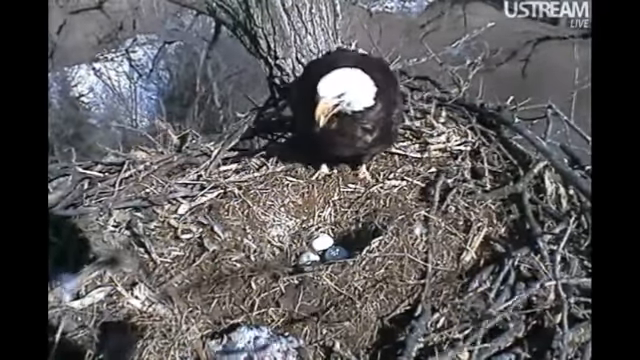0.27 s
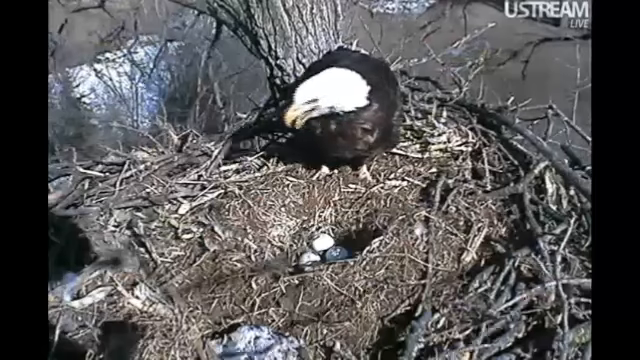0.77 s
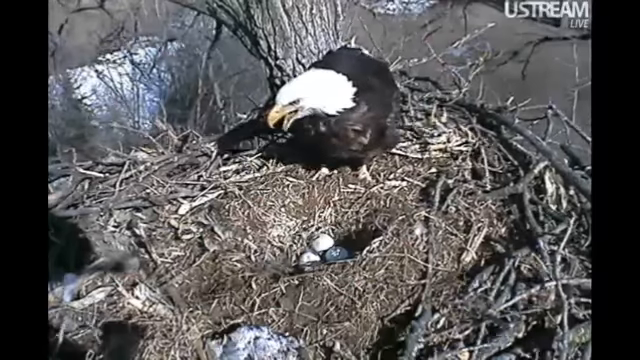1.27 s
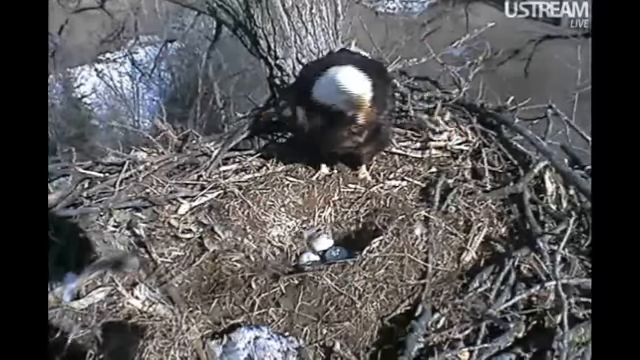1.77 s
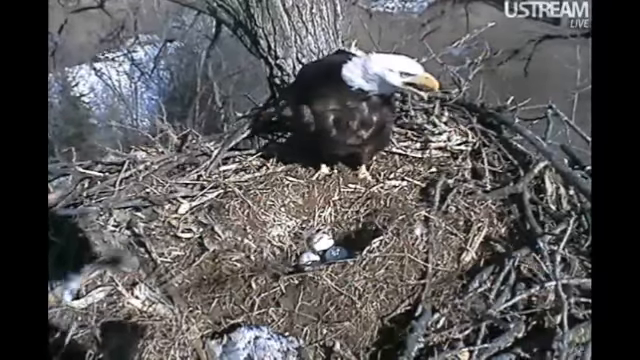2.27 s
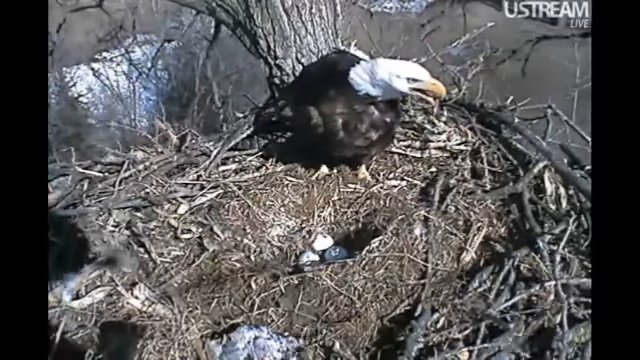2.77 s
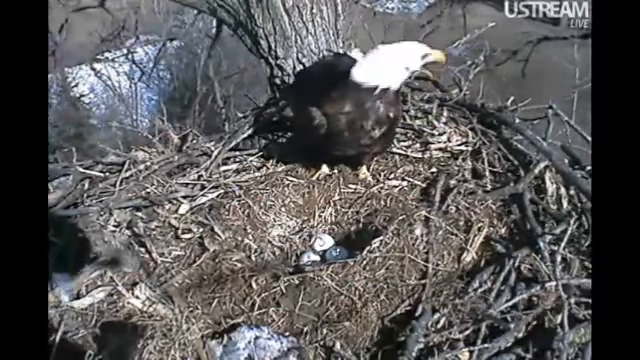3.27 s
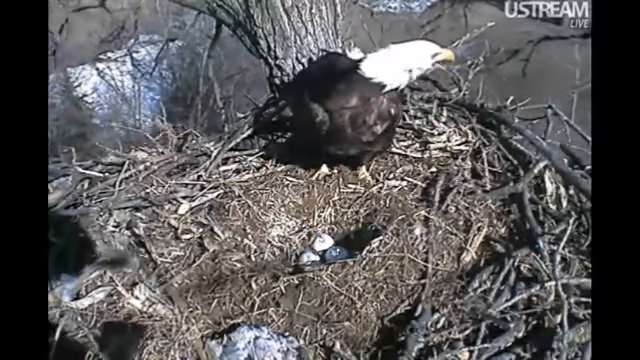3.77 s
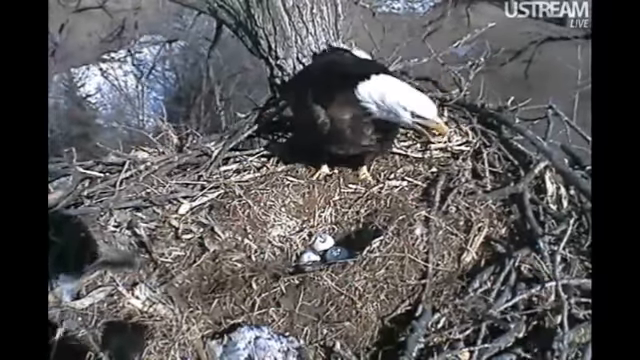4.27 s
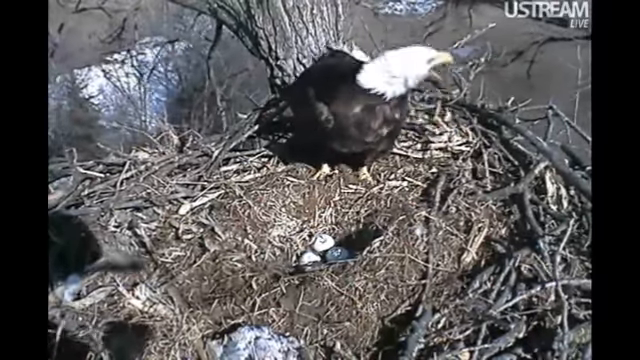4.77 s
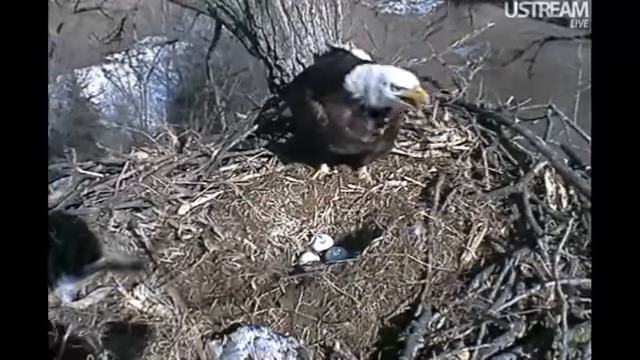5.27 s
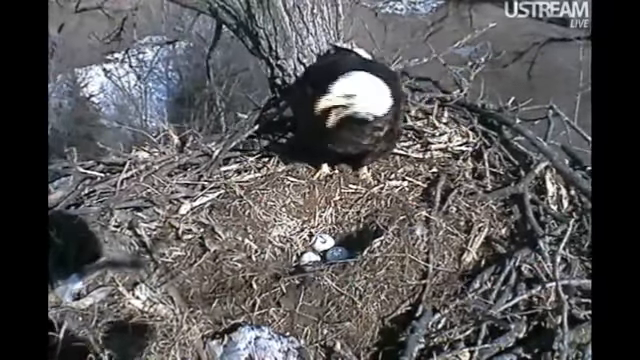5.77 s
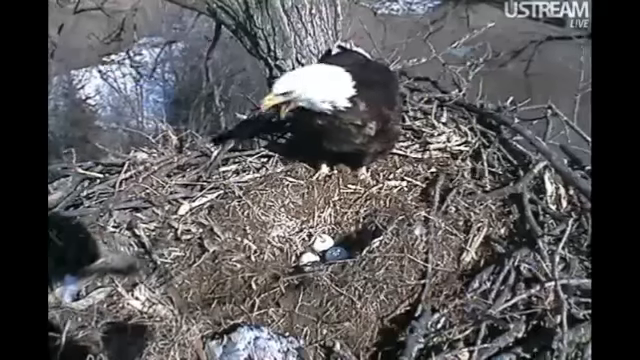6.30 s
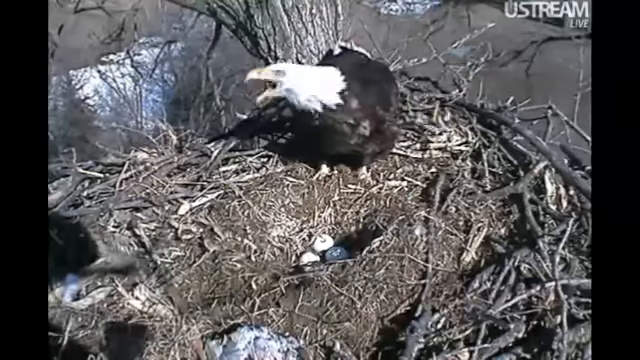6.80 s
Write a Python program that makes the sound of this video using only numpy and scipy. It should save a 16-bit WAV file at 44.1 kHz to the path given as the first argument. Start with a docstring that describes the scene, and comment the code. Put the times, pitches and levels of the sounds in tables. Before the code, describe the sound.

From the start, heavy wind roars low in the branches and buffets a small outdoor microphone, its gusts clipping into a gritty rasp. A bald eagle at its nest immediately gives three sharp, high whistled chirps within 0.3 seconds, ending in a soft chip. Wind alone fills the gap until 1.5, when four more chirps leap and drop in pitch, fading into lower chips by 2.0. Gusts swell around 2.5 to 2.9. Another four-chirp volley comes at 3.1 to 3.6, then a weaker, rougher, more reverberant one at 4.5 to 5.1. The wind eases from about 4.4, with small thuds of air near 4.8 to 5.5 and 6.1. The clearest, loudest volley, six chirps, runs 5.75 to 6.4, trailing into chips. Wind builds again, and at 6.9 a rough trilled squeal flips upward and sinks at the abrupt end.

```python
"""An eagle on its treetop nest chitters in alarm in strong wind, about 7 s.
From the start, wind roars in the trees and buffets a small microphone: two sums of third-octave noise bands.
Five bursts of chirps and soft chips follow, each chirp a whistle leaping through short pitch arches.
The wind eases in the fifth second and returns at the end, under a sixth call: one long trilled squeal.
Throughout, an overloaded amplifier turns gusts to a rasp and lets loud chirps push the wind aside."""
import sys
import numpy as np
from scipy import signal
from scipy.io import wavfile
from scipy.ndimage import uniform_filter1d

SR = 44100
rng = np.random.default_rng(int(sys.argv[2]) if len(sys.argv) > 2 else 0)


def transcribe(u):
    """Save the signal u as a 16-bit wav file named by the first command-line argument.

    u: samples, shape (n,) or (channels, n), limited to [-1, 1]; the rate is SR.
    q: integer samples, one column per channel.
    """
    v = np.clip(np.atleast_2d(u).T, -1, 1)
    q = np.round(v * 32767).astype(np.int16)
    wavfile.write(sys.argv[1], SR, q)


N = 310464

BUZZ_HZ = 700   # bandwidth of the irregular vibration
EDGE_S, RELEASE_S = 0.0018, 0.0016


def eagle(voice_db=0.5, jitter=0.00501, shimmer_db=3.5, octave_db=-13, rasp_db=-22,
          top_register_hz=6500, second_db=-16, scrape_db=-46, broadband_db=-19, loud_db=-27):
    """Syrinx whistle whose pitch bends and jumps; rough arches flutter and break up into a buzz."""
    hz, level, rough, opening = syrinx_controls()
    level = smooth(level, EDGE_S)
    # the membranes ring down
    ringing = butter(level, 1 / (2 * np.pi * RELEASE_S), "low", order=1)
    level = np.maximum(level, ringing)
    level = level * from_db(voice_db + shimmer_db * drift(254))

    flutter = 0.055 * rough * sine(520 * (1 + 0.25 * drift(60)))
    wobbly_hz = hz * (1 + flutter + jitter * drift(521))
    phase = 2 * np.pi * np.cumsum(wobbly_hz) / SR

    # louder calls gain a stronger octave and a broadband rasp, as from an overloaded converter
    loudness = np.minimum(level / from_db(loud_db), 1)
    noise = butter(rng.standard_normal(N), [2000, 12000], "band")
    broadband_rasp = from_db(broadband_db) * rms_one(noise)
    octave = from_db(octave_db) * np.cos(2 * phase)
    tone = np.sin(phase) + loudness * (octave + broadband_rasp)

    # irregular vibration spreads the tone into a noise band around its pitch
    swell, sway = rms_one(butter(rng.standard_normal((2, N)), BUZZ_HZ, "low", order=4))
    buzz = (swell * np.sin(phase) + sway * np.cos(phase)) / 2
    air = rms_one(butter(rng.standard_normal(N), [2600, 7500], "band", order=3))
    voice = np.sqrt(1 - rough ** 2 / 2) * tone + rough * (buzz + from_db(rasp_db) * air)

    # in the top register the other side of the syrinx adds a low second voice
    in_top = smooth(1.0 * (hz > top_register_hz), EDGE_S)
    second = from_db(second_db) * in_top * sine(2600 * (1 + 0.057 * drift(329.4)))
    scrape = from_db(scrape_db) * smooth(opening, 0.0037) * air
    return level * (voice + second) + scrape


# chirps: quick high warble arches, then a drop to a longer closing arch; levels before voice gain
# [t/s, length/s, warble arches, warble f/Hz, climb over warble/Hz, closing f/Hz,
#  warble level/dB, closing level/dB, roughness/0-1]
CHIRP_ROWS = [(0.063, 0.029, 1, 4665, 96, 4010, -22, -19.5, 0),
              (0.158, 0.031, 1, 4570, -700, 3920, -22, -22, 0.3),
              (0.255, 0.030, 1, 3870, -500, 3590, -22.5, -32.5, 0.3),
              (1.477, 0.048, 2, 3900, 0.5, 3790, -32, -31, 0.4),
              (1.588, 0.043, 2, 4890, 150, 4040, -26, -25, 0.2),
              (1.700, 0.030, 1, 5040, 300, 4186, -22.5, -20, 0.16),
              (1.812, 0.033, 1, 3940, -200, 3190, -20, -30.5, 0.12),
              (3.1, 0.043, 2, 4410, -0.5, 3870, -24.5, -25.5, 0.2),
              (3.209, 0.044, 2, 4740, 101, 4780, -39, -35, 0.67),
              (3.328, 0.04, 2, 4780, 299, 3910, -25.5, -28.5, .03),
              (3.442, 0.028, 1, 4435, 304, 3870, -33.5, -22, 0),
              (4.480, 0.037, 1, 3750, -200, 3640, -30.5, -36.5, 0.2),
              (4.573, 0.046, 2, 4660, 0, 3800, -33, -34, .3),
              (4.671, 0.041, 2, 5200, 0, 4720, -38, -32, 0.57),
              (4.77, 0.048, 2, 4250, -300, 3100, -31, -47, .7),
              (4.876, 0.042, 2, 3725, -200, 2960, -33.5, -47, .05),
              (5.752, 0.061, 1, 4390, 550, 3860, -25.5, -16, .16),
              (5.873, 0.045, 2, 5200, 1500, 4770, -28.5, -22.5, 0.31),
              (5.984, 0.044, 2, 4840, 50, 3900, -23, -25, .33),
              (6.094, 0.028, 1, 4700, 400.5, 3924, -26, -22, 0.65),
              (6.195, 0.044, 2, 3720, -100, 3140, -25.5, -42, 0.37),
              (6.304, 0.03, 1, 3905, -400, 3020, -31, -40, 0.33)]
# soft single chips; levels before voice gain
# [t/s, length/s, f/Hz, level/dB, roughness/0-1]
CHIP_ROWS = [(0, 0.011, 3900, -35.5, .15), (0.352, 0.009, 4047, -38.5, 0.7),
             (1.924, 0.012, 3090, -26.5, .45), (2.028, 0.01, 2850, -33, 0.15),
             (3.556, 0.018, 3616, -25.5, 0.29), (4.973, 0.019, 3530, -33.5, 0.16),
             (5.062, 0.028, 2880, -55, .2), (6.404, 0.015, 3103, -33.5, 0.77),
             (6.496, 0.017, 2834, -44.5, 0.36)]
DROOP_HZ_PER_S = 11000   # fall of closing arches and chips


def syrinx_controls(scrape_s=0.013, high_hz=4680):
    """Pitch, level, roughness and opening scrape, sample by sample."""
    t = np.arange(N) / SR
    hz, level, rough, opening = np.zeros((4, N))
    strokes = [stroke for row in CHIRP_ROWS for stroke in chirp(*row)]
    strokes += [arch(*row, -DROOP_HZ_PER_S) for row in CHIP_ROWS]
    strokes += [squeal()]
    for stroke in strokes:
        s, *controls = np.transpose(stroke)
        span = slice(*np.searchsorted(t, [s[0], s[-1]]))
        hz[span], db, rough[span] = (np.interp(t[span], s, c) for c in controls)
        level[span] = from_db(db)
    for start, _, _, warble_hz, *_ in CHIRP_ROWS:
        if warble_hz > high_hz:   # a high start scrapes before the membranes lock
            scrape_span = np.searchsorted(t, [start - scrape_s / 2, start + scrape_s / 2])
            opening[slice(*scrape_span)] = 1
    # the tension is carried through the pauses
    sounding = np.flatnonzero(hz)
    hz = np.interp(np.arange(N), sounding, hz[sounding])
    return smooth(hz, 0.0006), level, smooth(np.clip(rough, 0, 1), 0.0009), opening


CLOSING_STRETCH = 1.24   # closing arch length / warble arch length
CLOSING_ROUGH_SHARE = 0.37   # closing roughness / warble roughness
FLICK_ABOVE_HZ = 4830   # chirps starting higher swoop in from above
FLICK_S, FLICK_FROM_HZ, FLICK_DB = 0.007, 7900, -23   # level re warble
DIP_HZ = 520   # largest downward overshoot at the drop
QUICK_ARCH_S = 0.015   # slower arches overshoot less


def chirp(start, length, arches, warble_hz, climb_hz, closing_hz, warble_db, closing_db, roughness):
    """Membrane tension jumps between strokes: flick if high, equal-length warble arches, closing arch."""
    count = int(round(arches))
    arch_s = length / (count + CLOSING_STRETCH)
    warble_s = count * arch_s
    if warble_hz > FLICK_ABOVE_HZ:
        flick_db = warble_db + FLICK_DB
        yield [(start - FLICK_S, FLICK_FROM_HZ, flick_db, roughness),
               (start, warble_hz, flick_db, roughness)]
    for k in range(count):
        top_hz = warble_hz + climb_hz * ((k + 0.5) / count - 0.5)
        yield arch(start + k * arch_s, arch_s, top_hz, warble_db, roughness, climb_hz / warble_s)
    dip_hz = DIP_HZ * min(QUICK_ARCH_S / arch_s, 1) ** 2
    yield arch(start + warble_s, length - warble_s, closing_hz, closing_db,
               CLOSING_ROUGH_SHARE * roughness, -DROOP_HZ_PER_S, dip_hz)


SAG_HZ, SAG_GROWTH, SAG_ABOVE_HZ = 130, 0.66, 3800   # arch ends sag more, the higher the top
ARCH_SQUARENESS = 3.4   # 2 = round; higher = flatter top, steeper sides
JOINT_LEVEL, JOINT_ROUGH = 0.34, 0.52   # end gain re peak; roughness added at the ends
DIP_S = 0.0035   # spring-back time constant


def arch(start, length, top_hz, peak_db, roughness, climb_hz_per_s, dip_hz=0):
    """One rise and fall on a steady slope, perhaps out of a dip: rows of t/s, f/Hz, level/dB, roughness."""
    along = np.linspace(-1, 1, num=21)
    elapsed = length * (along + 1) / 2
    sag_hz = SAG_HZ + SAG_GROWTH * max(top_hz - SAG_ABOVE_HZ, 0)
    hz = top_hz - sag_hz * np.abs(along) ** ARCH_SQUARENESS
    hz = hz + climb_hz_per_s * (elapsed - length / 2)
    hz = hz - dip_hz * np.exp(-elapsed / DIP_S)
    swell = np.interp(np.cos(np.pi * along / 2), [0, 1], [JOINT_LEVEL, 1])
    db = peak_db + 20 * np.log10(swell)
    return np.column_stack([start + elapsed, hz, db, roughness + JOINT_ROUGH * along ** 4])


# squeal: trills, flips to the top register, sinks; f before trill, level before voice gain
# [t/s, f/Hz, level/dB, roughness/0-1, clipped at 1 in the voice]
SQUEAL_PATH = [(6.874, 5450, -32, 0), (6.883, 5450, -36, 0.1), (6.89, 4500, -30.5, 0.7),
               (6.942, 4550, -31.5, .7), (6.944, 8600, -49, 0.1), (6.964, 7500, -31, 0.06),
               (6.982, 8700, -40.5, 0.17), (7.003, 4600, -27.5, 0.7), (7.039, 2800, -43, 1.06)]
TRILL_HZ = 69
TRILL_DEPTH = 0.23   # relative pitch swing at roughness 1


def squeal():
    """Long last call; the rougher the vibration, the wider the trill."""
    s, *controls = np.transpose(SQUEAL_PATH)
    t = np.arange(s[0], s[-1], 1 / SR)
    hz, db, rough = (np.interp(t, s, c) for c in controls)
    trill = TRILL_DEPTH * rough * np.cos(2 * np.pi * TRILL_HZ * (t - s[0]))
    return np.column_stack([t, hz * (1 - trill), db, rough])


# echoes from trunk and limbs [delay/s, level/dB]
LIMB_ECHOES = [(0.018, -20), (0.055, -24)]
# drive of the tree reflections, stronger with the beak turned away from the microphone [t/s, level/dB]
BEAK_TURN = [(0, -5), (1.8, -24), (3.1, -1), (4.5, -1), (5.1, 3), (5.7, -17), (7.04, -10)]


def woodland(call, nest_db=-17, nest_t60=0.09, trees_db=-29, trees_t60=0.7, dull_hz=5000):
    """Short bright spray off the nest's sticks, then duller echoes and a faint wash off the trees."""
    t = np.arange(N) / SR
    turn_db = np.interp(t, *np.transpose(BEAK_TURN))
    outward = butter(call, dull_hz, "low") * from_db(turn_db)
    nest = from_db(nest_db) * scatter(call, nest_t60)
    echoes = sum(from_db(db) * np.interp(t - delay, t, outward, left=0) for delay, db in LIMB_ECHOES)
    wash = from_db(trees_db) * scatter(outward, trees_t60)
    return nest + echoes + wash


def scatter(x, t60):
    """Countless small reflections that die away, as a decaying-noise response of unit energy."""
    t = np.arange(SR // 2) / SR
    tail = rng.standard_normal(len(t)) * np.exp(-np.log(1000) * t / t60)
    return signal.fftconvolve(x, tail / np.linalg.norm(tail))[:N]


# wind strength at the microphone [t/s, level/dB]
GUST_STRENGTH = [(0, -28), (0.25, -28), (0.6, -29), (0.92, -27.5), (1.3, -32.5), (1.55, -30), (2.05, -30),
                 (2.48, -27), (2.7, -30.3), (2.9, -26.7), (3.1, -29.5), (3.3, -29), (3.8, -29),
                 (3.95, -32.5), (4.24, -28.5), (4.38, -36), (5.1, -37.5), (5.3, -44.5), (5.47, -39),
                 (5.6, -42), (5.96, -46), (6.12, -42), (6.56, -35.5), (6.77, -38.5), (7.04, -27.5)]
# wind in the branches, relative spectrum [f/Hz, level/dB per Hz]
BRANCH_SPECTRUM = [(25, -3.5), (60, -1), (120, 2.5), (250, 0), (400, 0), (650, 0.5), (850, -2.5),
                   (1100, -15), (1500, -35.5), (2200, -27.5), (3800, -27.5), (4800, -34), (7000, -38),
                   (11000, -80)]
# eddies on the microphone, relative spectrum [f/Hz, level/dB per Hz]
EDDY_SPECTRUM = [(25, -43), (60, -13.5), (110, -0.5), (175, 3), (260, -1), (450, -3.5), (700, -9),
                 (1100, -33.5), (2000, -25), (5000, -46.5)]
# brief shoves of air on the microphone [t/s, extra buffeting level/dB]
AIR_SHOVES = [(1.12, 6), (3.51, 2), (3.98, 8), (4.756, 2), (4.83, 15.5), (4.956, 20), (5.14, 8),
              (5.469, 13.5), (6.09, 14.5)]
FULL_GUST_DB = -29   # strength at which both growths are zero


def wind(roar_db=-32.0, roar_growth=0.78, buffet_db=-31.0, buffet_growth=1.61, lumpy_db=3.0,
         puff_s=0.0084):
    """Roar follows the gusts gently; buffeting grows much faster and takes over in hard wind."""
    t = np.arange(N) / SR
    gust_db = np.interp(t, *np.transpose(GUST_STRENGTH)) - FULL_GUST_DB
    puff_db = sum(db * np.exp(-((t - s) / puff_s) ** 2) for s, db in AIR_SHOVES)
    shove_db = lumpy_db * drift(22.7) + puff_db
    roar_gain = from_db(roar_db + roar_growth * gust_db)
    buffet_gain = from_db(buffet_db + buffet_growth * gust_db + shove_db)
    roar = roar_gain * turbulence(BRANCH_SPECTRUM, patchy_db=2.0)
    buffet = buffet_gain * turbulence(EDDY_SPECTRUM, patchy_db=1.06)
    return roar + buffet


def turbulence(spectrum, patchy_db):
    """Third-octave bands of noise, each swelling and sinking on its own; rms 1."""
    points, out = np.array(spectrum), 0
    edges = 20 * 2 ** (np.arange(29) / 3)
    white = rng.standard_normal((2, N))   # neighbouring bands use different noise
    for k, (low, high) in enumerate(zip(edges, edges[1:])):
        level_db = np.interp(np.log(low * high) / 2, np.log(points[:, 0]), points[:, 1])
        band = butter(white[k % 2], [low, high], "band")
        out = out + from_db(level_db + patchy_db * drift(8.8)) * band
    return rms_one(out)


def drift(rate):
    """Smooth random motion, about `rate` turns a second, spread 1: low-passed noise."""
    r = np.exp(-16 * np.pi * rate / SR)   # double pole near `rate` Hz, for noise running at SR / 8
    noise = rng.standard_normal(N // 8 + 4002)
    slow = signal.lfilter([1], [1, -2 * r, r * r], noise)[4000:]   # drop the settling
    return np.interp(np.arange(N) / 8, np.arange(len(slow)), rms_one(slow))


def from_db(db):
    """Decibels to gain."""
    return 10 ** (np.asarray(db) / 20)


def rms_one(x):
    """Scale to an rms of 1."""
    return x / np.sqrt(np.mean(x ** 2) + 1e-20)


def butter(x, hz, kind, order=2):
    """Causal Butterworth filter."""
    return signal.sosfilt(signal.butter(order, hz, kind, fs=SR, output="sos"), x)


def smooth(x, seconds):
    """Round off steps with two moving averages of this width."""
    width = max(int(seconds * SR), 1)
    return uniform_filter1d(uniform_filter1d(x, width), width)


def sine(hz):
    """Sine that follows a moving frequency."""
    return np.sin(2 * np.pi * np.cumsum(hz) / SR)


def scene():
    """Bird, reflections and wind add at one microphone."""
    call = eagle()
    return (call + woodland(call) + wind())[None]


OVERLOAD_DB, OVERLOAD_KNEE = -31.3, 13   # clip level; higher knee = harder corner
CUTOFF_HZ = 11950


def record(dry, bias=0.013, coupling_hz=9, hiss_db=-80, droop_hz=12500):
    """Amplifier flattens the peaks, a little unevenly; then its hiss and a steep treble cut."""
    top = from_db(OVERLOAD_DB)
    # 3x oversampling limits aliasing
    drive = signal.resample_poly(dry, 3, 1, axis=-1) / top + bias
    clipped = drive / (1 + np.abs(drive) ** OVERLOAD_KNEE) ** (1 / OVERLOAD_KNEE)
    flat = top * (clipped - bias)
    out = signal.resample_poly(flat, 1, 3, axis=-1)
    out = butter(out, coupling_hz, "high", order=1)
    out = out + from_db(hiss_db) * rng.standard_normal(N)
    out = butter(out, droop_hz, "low")
    return signal.sosfilt(signal.ellip(10, 0.2, 70, CUTOFF_HZ, fs=SR, output="sos"), out)


dry = scene()
out = record(dry)
transcribe(out)
```